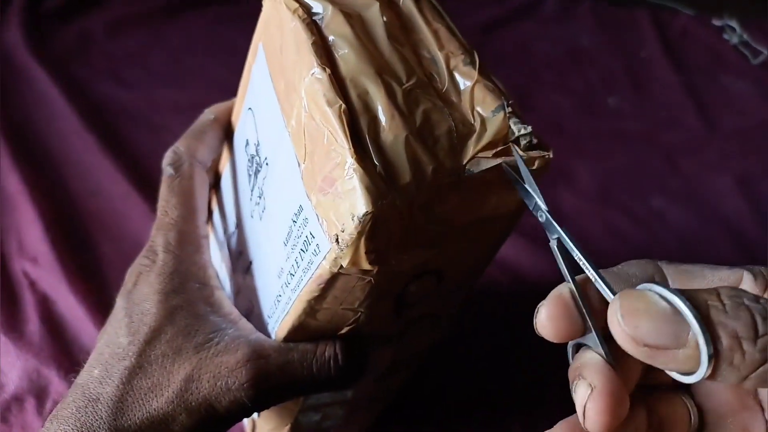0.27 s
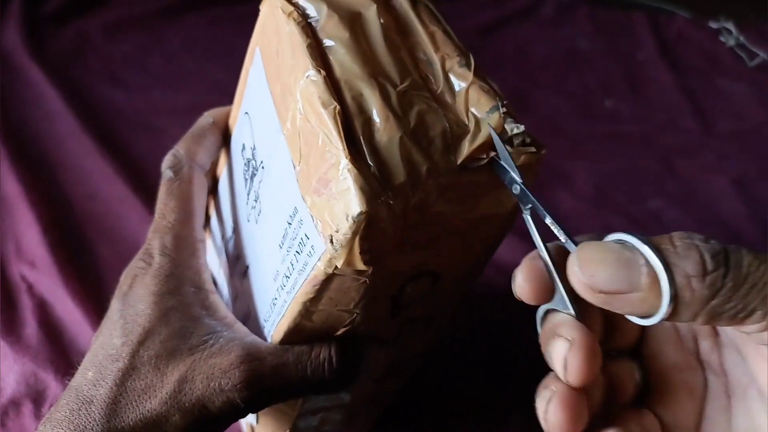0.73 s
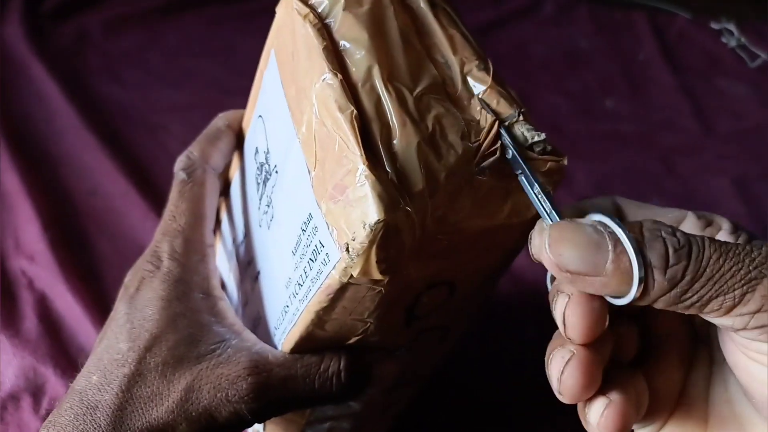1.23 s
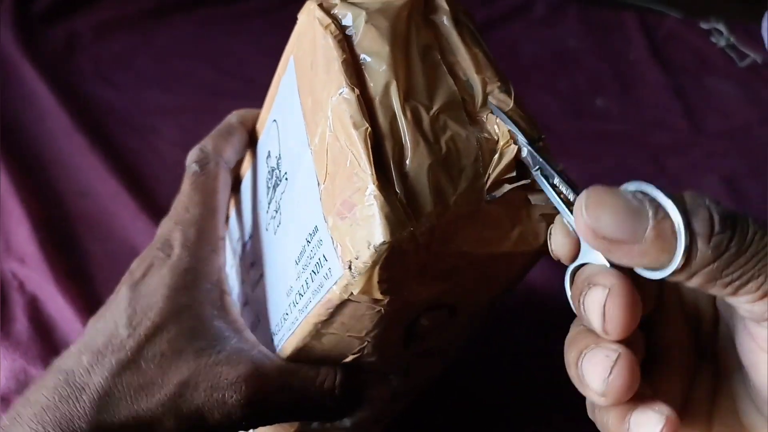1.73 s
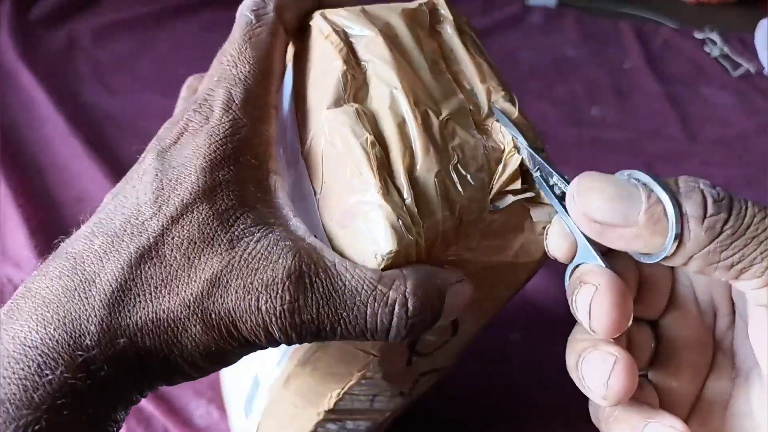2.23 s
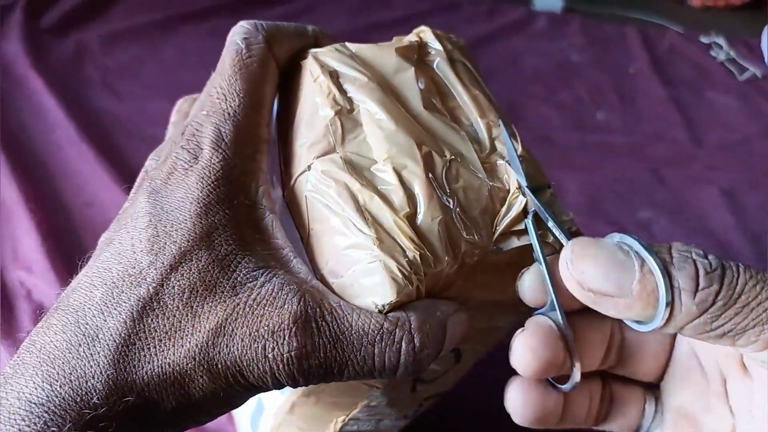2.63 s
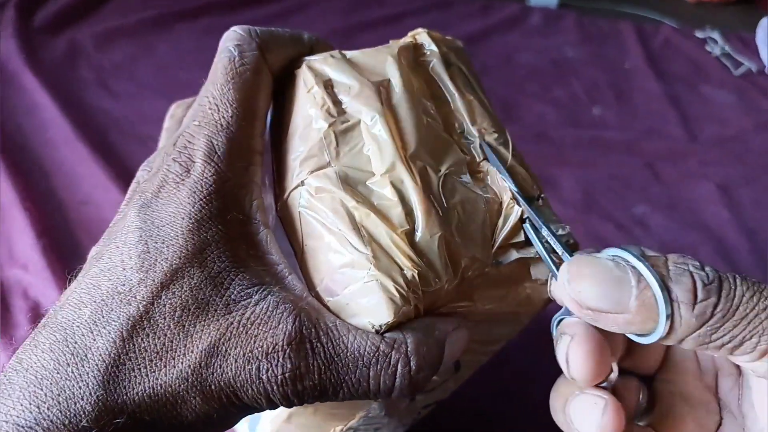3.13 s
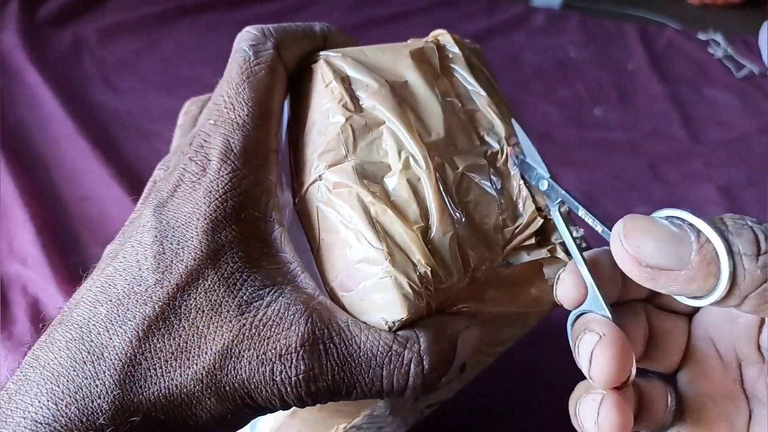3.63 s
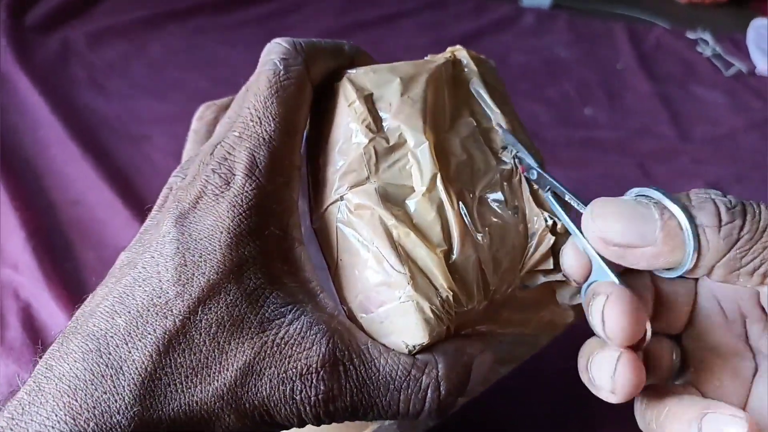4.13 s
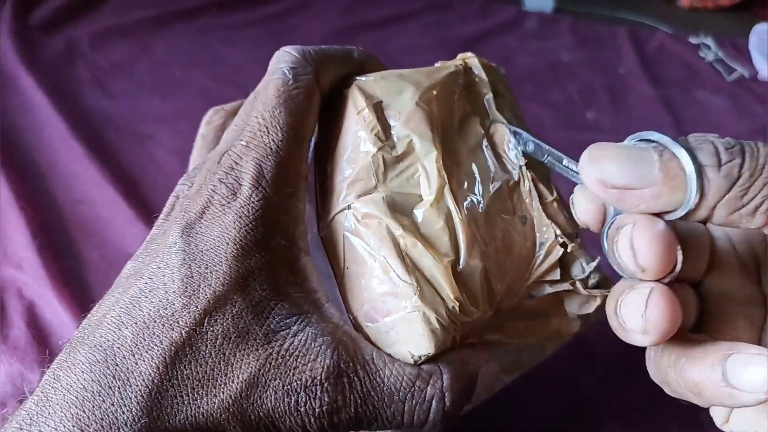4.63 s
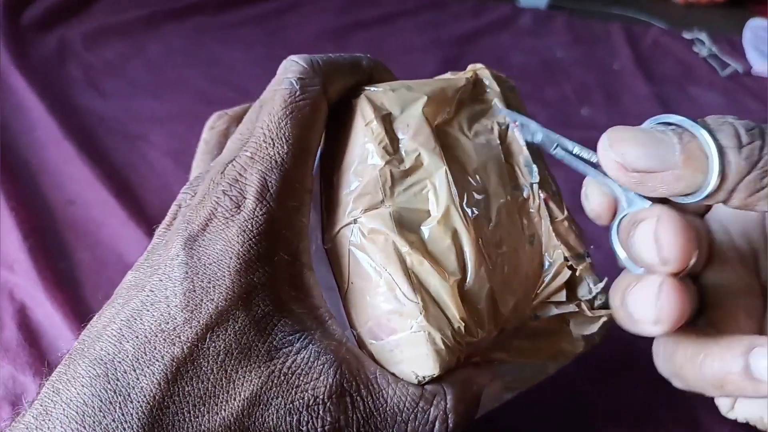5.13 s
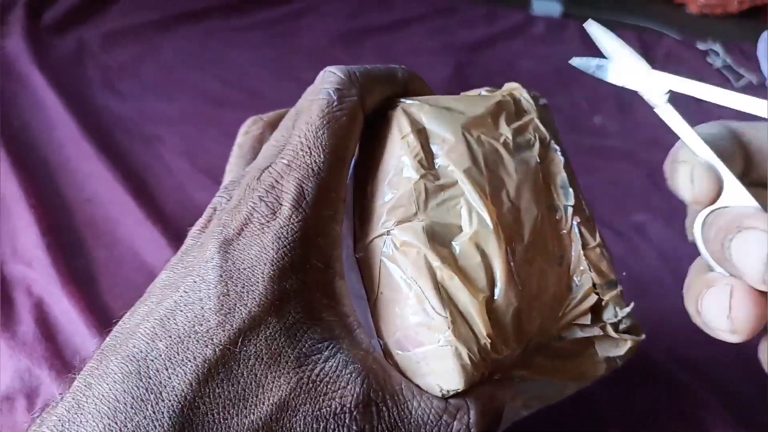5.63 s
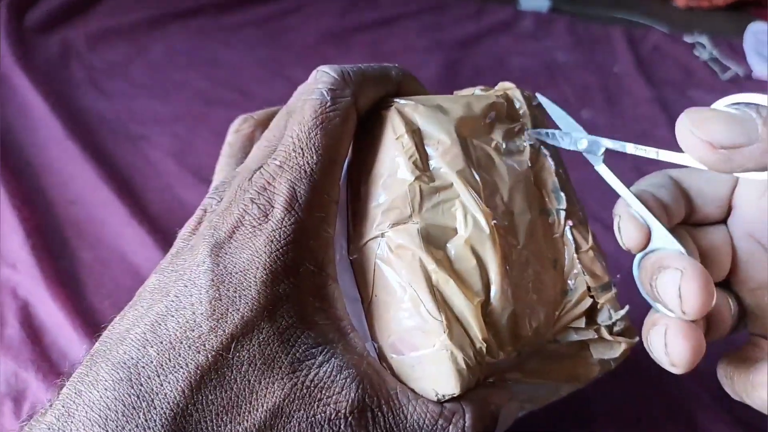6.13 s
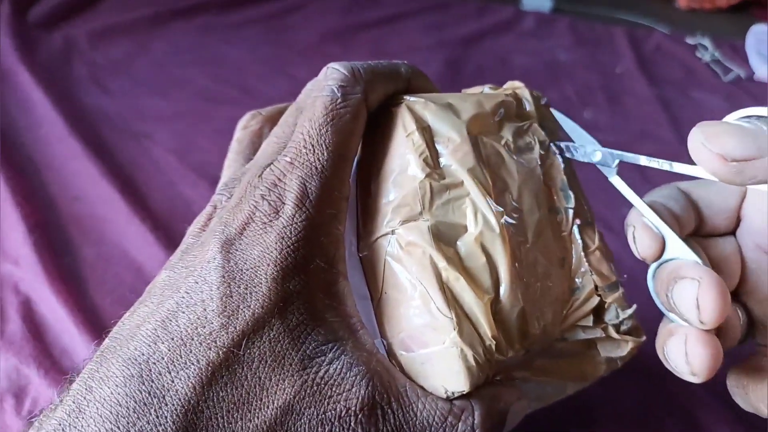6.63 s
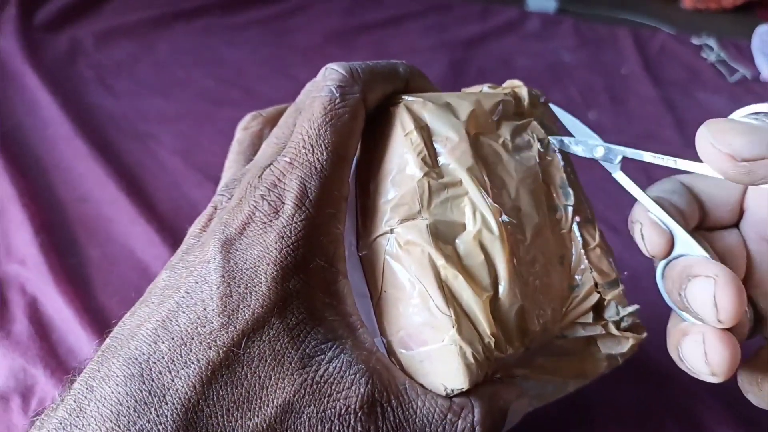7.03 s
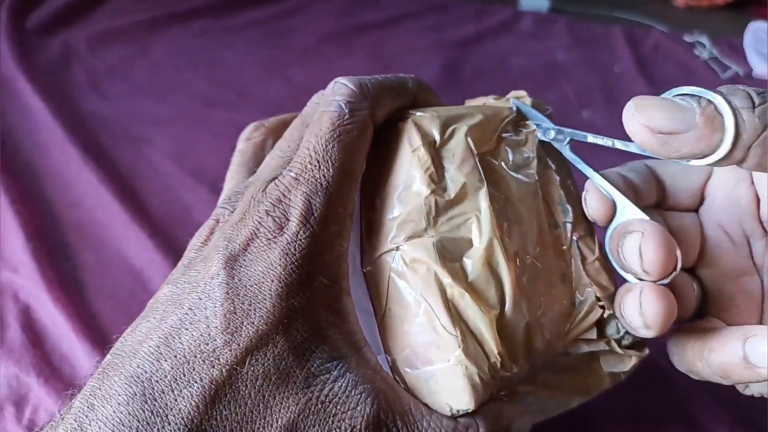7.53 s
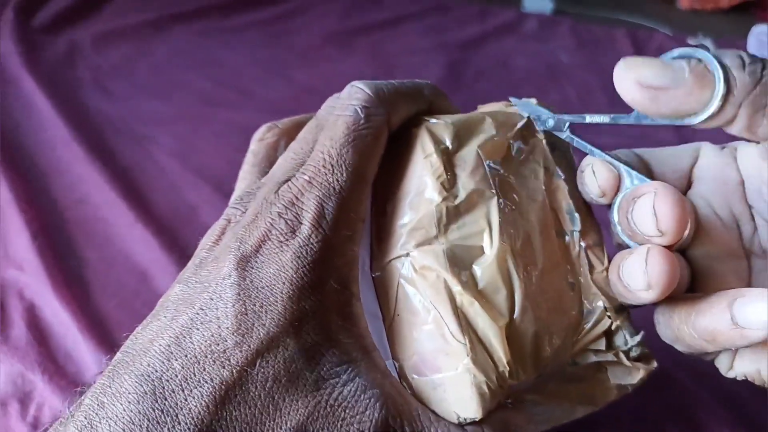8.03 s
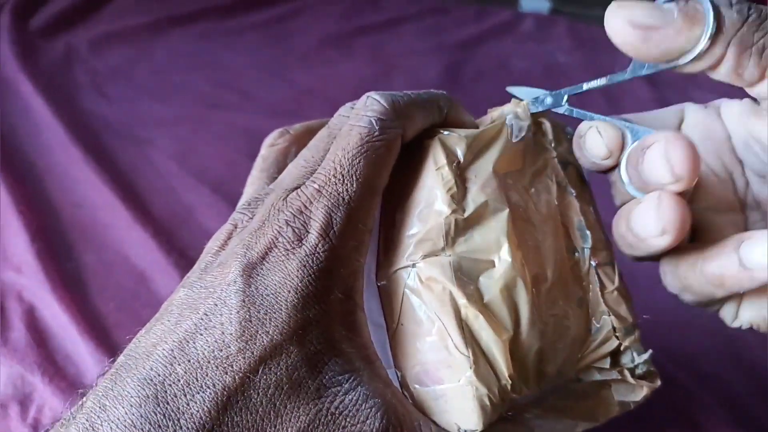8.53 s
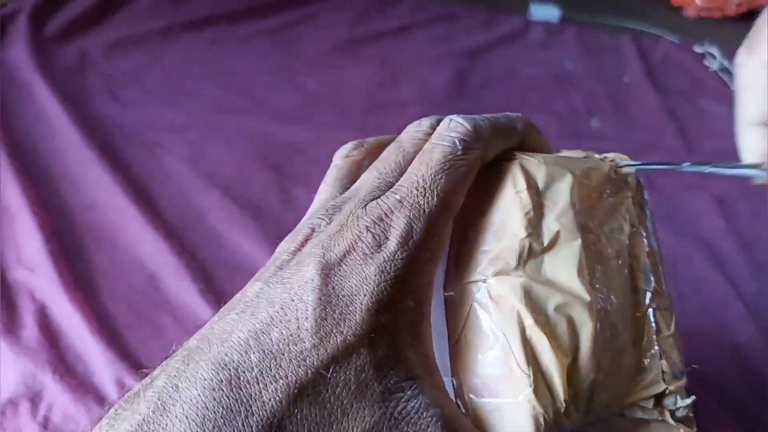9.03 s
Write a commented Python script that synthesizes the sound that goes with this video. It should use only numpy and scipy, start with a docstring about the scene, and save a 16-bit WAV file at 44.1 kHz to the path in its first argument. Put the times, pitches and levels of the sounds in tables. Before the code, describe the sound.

Close crackles, snaps and short rustles of parcel tape with dull cardboard knocks, over a soft distant rumble and steady room hush.

```python
"""A push booms and knocks in a hollow card parcel, close to a phone in a quiet room, over a soft low rumble.
Then small scissors pry and snip at its plastic tape: creases snap, crackle and rustle in short spells.
Snaps and knocks are noise bursts with brief rings; handling is random pops over sliding noise through
sheet and parcel resonances. A distant rumble swells and fades over the room's steady hush.
Two microphone ports hear it all with a short, dull echo on the close sounds."""
import sys
import numpy as np
from scipy import signal
from scipy.fft import rfft, irfft, next_fast_len
from scipy.io import wavfile
from scipy.ndimage import uniform_filter1d

SR = 44100
rng = np.random.default_rng(int(sys.argv[2]) if len(sys.argv) > 2 else 0)


def digitize_waveform(pressure):
    """Quantize a signal to 16-bit integers and store it at the path in sys.argv[1].

    Rows of a 2-D input are taken as channels; values are limited to [-1, 1].
    """
    field = np.atleast_2d(pressure).T
    bounded = np.clip(field, -1, 1)
    quanta = np.round(bounded * 32767).astype(np.int16)
    wavfile.write(sys.argv[1], SR, quanta)


N = 409688

# hush of the room, spectrum before overall levelling: pitch_hz [Hz], density_db [dB per Hz]
HUSH_SPECTRUM = [(30, 11), (80, 15.5), (280, -7), (600, 0), (1700, -2.5), (2500, -73), (4500, -47),
                 (8000, -87), (16000, -64)]
# swells of the distant rumble: time_s [s], level_db [dB]
RUMBLE_LEVEL = [(0.0, -54), (0.32, -65), (0.42, -43), (0.55, -54.5), (0.9, -53), (1.05, -59.5), (2.42, -57),
                (2.79, -64), (4.1, -60.5), (5.1, -60), (5.21, -54), (5.3, -59), (5.58, -38.5),
                (6.17, -45.5), (7.1, -46), (7.62, -54), (7.86, -38), (8.35, -41.5), (8.94, -48.5),
                (9.28, -41)]
# lowest resonances of the room, applied twice: pitch_hz [Hz], width_hz [Hz], one_pass_db [dB]
ROOM_MODES = [(74.9, 41.2, -2), (107.8, 42.3, 0.5), (151, 35.2, -0.5), (217.2, 47, -6)]
# pushes of the scissors against the wrap:
# start_s [s], hold_s [s], crackle_db [dB], sheet_rustle_db [dB], parcel_boom_db [dB]
SCISSOR_PUSHES = [(0, 0.017, -81, -68, -38), (0.068, 0.022, -88, -79, -44), (0.226, 0.016, -64, -70, -67),
                  (0.321, 0.011, -57, -66, -51), (0.4, 0.037, -64, -57.5, -41),
                  (0.491, 0.066, -50, -55, -49), (0.747, 0.029, -50, -53, -43),
                  (0.834, 0.043, -47, -45, -42), (0.915, 0.026, -34.5, -38.5, -36.5),
                  (0.973, 0.15, -56.5, -67, -56), (1.022, 0.034, -49, -57, -46),
                  (1.183, 0.059, -48, -53.5, -47.5), (1.274, 0.078, -46.5, -51, -53.5),
                  (1.481, 0.059, -46.5, -54.5, -51.5), (1.654, 0.23, -52, -56, -54),
                  (1.764, 0.15, -51, -50, -48.5), (1.976, 0.077, -52, -54, -53),
                  (2.132, 0.032, -52, -52, -55.5), (2.214, 0.09, -44, -46, -46.5),
                  (2.397, 0.046, -41, -42.5, -48.5), (2.492, 0.23, -48.5, -53.5, -56.5),
                  (2.747, 0.28, -55.5, -58, -78), (3.012, 0.12, -48, -51, -52),
                  (3.18, 0.1, -49.5, -57, -49.5), (3.336, 0.095, -40.5, -43.5, -45.5),
                  (3.674, 0.1, -54.5, -52.5, -51.5), (3.788, 0.12, -48, -52.5, -57),
                  (3.893, 0.075, -43, -44, -45.5), (3.99, 0.13, -54, -61, -60),
                  (4.18, 0.14, -51.5, -53.5, -51.5), (4.393, 0.084, -50, -49, -48.5),
                  (4.601, 0.036, -40.5, -40, -45.5), (4.699, 0.11, -42, -42.5, -43),
                  (4.975, 0.02, -40.5, -43, -43), (5.063, 0.026, -66, -74, -71),
                  (5.179, 0.026, -39.5, -39, -41), (5.259, 0.1, -49.5, -47, -49.5),
                  (5.436, 0.046, -51, -43.5, -48.5), (5.525, 0.088, -42, -42, -45),
                  (5.686, 0.68, -61.5, -57, -56), (5.696, 0.12, -61, -72, -69),
                  (6.238, 0.061, -58, -60, -65), (6.466, 0.017, -58, -65, -67),
                  (6.523, 0.055, -63.5, -68, -60), (6.72, 0.089, -58.5, -60.5, -54),
                  (6.955, 0.057, -59.5, -58.5, -49.5), (7.064, 0.13, -61, -68, -66),
                  (7.367, 0.061, -46.5, -44, -42.5), (7.585, 0.12, -49, -50.5, -49),
                  (7.725, 0.032, -63, -52.5, -49.5), (7.829, 0.088, -48, -48, -50),
                  (8.037, 0.13, -50, -47.5, -51), (8.205, 0.071, -57.5, -54.5, -61),
                  (8.319, 0.046, -38.5, -38, -39.5), (8.407, 0.1, -57.5, -53.5, -50),
                  (8.542, 0.13, -54, -52, -51.5), (8.788, 0.11, -51, -51.5, -57),
                  (8.961, 0.023, -49.5, -53, -63), (9.054, 0.052, -44, -41, -44.5),
                  (9.227, 0.09, -54, -56, -44.5)]
# parcel merely held, one value each: crackle_db, rustle_db, boom_db [dB]
HELD_LEVELS = [-68.5, -64, -56.5]
# resonances of the plastic sheet: pitch_hz [Hz], width_hz [Hz], level_db [dB]
SHEET_MODES = [(1132, 257, -1), (1910, 1050, 4.5), (2410, 1800, 4.5), (3320, 525, 1)]
# resonances of the hollow parcel, one pass for knocks, two for boom:
# pitch_hz [Hz], width_hz [Hz], one_pass_db [dB]
PARCEL_MODES = [(240.3, 134.5, 0), (396, 162, 0.5), (661, 321, -3.5), (1230, 480, -20.5)]
# knocks into the parcel, before layer gains and limits on fall:
# peak_s [s], level_db [dB], pitch_hz [Hz], fall_s [s]
PARCEL_KNOCKS = [(0.029, -32.5, 269, 0.011), (0.26, -36.5, 734, 0.0015), (0.553, -31, 437, 0.0017),
                 (0.749, -15, 370, 0.0027), (0.833, -19, 388, 0.003), (0.923, -18, 500, 0.001),
                 (0.933, -9, 530, 0.0017), (0.943, -28, 260, 0.0023), (0.98, -26, 308, 0.0029),
                 (0.996, -29, 340, 0.0029), (1.018, -15.5, 390, 0.0032), (1.064, -30.5, 300, 0.0062),
                 (1.228, -27.5, 620, 0.0011), (2.024, -26.5, 820, 0.0009), (2.28, -24, 674, 0.00088),
                 (2.297, -38, 330, 0.0015), (2.354, -34, 676, 0.0016), (3.107, -29, 284, 0.0029),
                 (3.286, -36, 320, 0.002), (3.36, -18.5, 305, 0.0053), (3.423, -23.5, 680, 0.002),
                 (3.943, -38, 305, 0.0034), (4.253, -21, 310, 0.0031), (4.401, -30.5, 332, 0.0051),
                 (4.451, -35.5, 358, 0.011), (4.603, -33, 342, 0.0029), (4.716, -33, 330, 0.0033),
                 (4.983, -30, 270, 0.003), (5.128, -31.5, 353, 0.0043), (5.188, -29.5, 313, 0.0025),
                 (5.204, -24, 229, 0.0035), (5.212, -28, 350, 0.0053), (5.363, -26, 273, 0.0025),
                 (5.626, -27.5, 300, 0.005), (6.239, -34, 320, 0.0032), (6.545, -22, 347, 0.003),
                 (6.988, -25.5, 320, 0.0029), (7.355, -35, 220, 0.003), (7.396, -33, 347, 0.01),
                 (7.902, -32, 313, 0.0042), (8.317, -27, 314, 0.0054), (8.329, -37, 270, 0.0027),
                 (8.341, -14, 290, 0.0026), (8.37, -30, 295, 0.0054), (8.597, -26, 354, 0.00079),
                 (8.71, -27.5, 790, 0.0014), (8.791, -20, 580, 0.00052), (8.811, -28, 705, 0.00082),
                 (9.118, -30, 310, 0.0041), (9.2, -29.5, 650, 0.0014), (9.251, -27.5, 363, 0.0035)]
# single snaps of the tape, before layer gains:
# peak_s [s], crack_db [dB], crack_hz [Hz], sizzle_db [dB], sheet_ring_db [dB], sheet_ring_hz [Hz]
TAPE_SNAPS = [(0.2577, -47, 7400, -46, -44, 2300), (0.5505, -28.5, 7500, -20.5, -26, 2470),
              (0.563, -50, 5800, -43, -48, 1700), (0.5817, -41, 6640, -31, -52, 1020),
              (0.6115, -36, 8800, -32, -39.5, 3130), (0.732, -30, 8700, -29, -43, 1850),
              (0.748, -17.5, 7200, -12.5, -13.5, 1100), (0.7533, -36, 7200, -21, -21.5, 980),
              (0.7675, -35, 6000, -31, -38, 1810), (0.832, -36, 5270, -27.5, -45, 750),
              (0.8713, -37, 5400, -45, -46, 2270), (0.9319, -27, 8900, -18, -14.5, 750),
              (0.9434, -25, 6540, -18, -25, 1050), (1.0049, -38, 6600, -37, -49, 830),
              (1.1155, -42, 6500, -49, -36.5, 1920), (1.1353, -34, 4700, -40, -41, 2800),
              (1.1898, -22, 6440, -39, -42, 3530), (1.3088, -32, 6700, -38, -40, 1970),
              (1.3332, -45, 9500, -25.5, -43, 750), (1.3663, -23.5, 5300, -55, -36, 2110),
              (1.4773, -32, 4230, -34, -35.5, 2860), (1.4946, -31, 6800, -27, -33, 2130),
              (1.529, -37, 5400, -35, -41, 750), (1.5935, -27.5, 5100, -45, -33.5, 2400),
              (1.8171, -34, 4430, -41, -23, 2850), (1.8937, -26.5, 6350, -20.5, -43, 2930),
              (1.9972, -47, 8600, -30, -58, 3480), (2.0226, -30, 6500, -29, -23.5, 1040),
              (2.1966, -44, 9000, -23.5, -47, 2450), (2.2172, -23, 6540, -21, -27, 2400),
              (2.2433, -30, 6400, -34, -31.5, 1390), (2.2615, -42, 6600, -33, -31, 1490),
              (2.2785, -37, 6400, -23, -30.5, 730), (2.2834, -23, 9400, -15.5, -32, 790),
              (2.3207, -32, 6100, -29, -35, 1170), (2.3535, -20, 6200, -21, -21, 3170),
              (2.3966, -40, 5600, -29, -25.5, 1240), (2.4236, -46, 8900, -36, -33, 2430),
              (2.5122, -30, 4830, -34, -36, 3100), (2.5323, -39, 4200, -40, -28, 2820),
              (2.5774, -30.5, 6300, -28, -26.5, 2700), (2.6476, -36, 3620, -29, -31, 3100),
              (2.6867, -40, 7900, -29, -37, 2310), (2.6971, -32, 6200, -31, -53, 1720),
              (2.9372, -37, 6300, -28, -39.5, 2080), (3.0248, -24, 4700, -37, -37, 2280),
              (3.047, -35, 3900, -25, -23.5, 2670), (3.1049, -34, 6600, -26, -29, 1860),
              (3.2418, -29, 9500, -30, -30, 3180), (3.2593, -29, 6160, -28, -41, 1980),
              (3.2903, -31, 3560, -49, -28.5, 3100), (3.3325, -26.5, 5800, -26, -20, 3020),
              (3.3541, -25, 6100, -27, -33, 740), (3.3668, -24, 6100, -23, -24.5, 2140),
              (3.4012, -42, 7800, -31, -41, 2150), (3.4231, -42, 5200, -34, -18, 1120),
              (3.4392, -30, 7500, -19, -33, 3220), (3.611, -39, 5760, -54, -45, 2240),
              (3.7188, -48, 6000, -29, -42, 1730), (3.7405, -30, 7000, -30, -26, 2390),
              (3.9357, -30, 6200, -26, -30, 1940), (3.942, -33, 8000, -26, -33, 750),
              (3.973, -32, 9500, -37, -34, 2020), (4.013, -32, 8500, -30, -37, 2010),
              (4.0622, -36, 5230, -46, -31, 2400), (4.104, -35, 7400, -23.5, -22.5, 2210),
              (4.2533, -24, 7500, -24, -24.5, 2770), (4.3178, -36, 5830, -46, -34, 1290),
              (4.3222, -41, 6400, -33, -46, 2620), (4.3441, -35, 6100, -42, -23.5, 2220),
              (4.3542, -30, 7600, -28, -40, 2730), (4.4565, -37, 6600, -22.5, -44, 1800),
              (4.5004, -30, 7360, -30.5, -38, 3320), (4.6077, -26.5, 7500, -32, -47, 1870),
              (4.7252, -34, 6000, -36, -32, 2240), (4.8, -44, 6700, -36, -42, 2250),
              (4.9436, -58, 9300, -29, -35, 2140), (4.9744, -25, 9500, -27, -24, 1520),
              (4.9827, -30, 7200, -27, -19.5, 2800), (5.0005, -32, 4100, -26, -20, 2350),
              (5.0766, -38, 3600, -25, -24, 2830), (5.0938, -46, 9500, -31, -44, 2880),
              (5.0985, -34.5, 6500, -30, -28.5, 2840), (5.1993, -30, 6800, -26, -35, 3050),
              (5.2807, -34, 6300, -34, -30, 2530), (5.3459, -49, 5600, -53, -30.5, 2190),
              (5.3549, -35, 6400, -43, -23, 2280), (5.3631, -29, 6700, -22.5, -18, 2670),
              (5.4673, -44, 9500, -20.5, -47, 1880), (5.5051, -27, 8300, -25.5, -34, 3060),
              (5.5284, -37, 7800, -28, -42, 2800), (5.5889, -32, 6200, -28, -21, 2760),
              (5.5961, -27, 5800, -38, -31, 3010), (5.6046, -38, 3600, -31, -46, 3180),
              (5.7452, -42, 6500, -38, -56, 1640), (5.7831, -33, 8250, -27, -33, 2660),
              (6.1261, -40, 5900, -38, -25.5, 2450), (6.2637, -41, 6700, -32.5, -41, 2280),
              (6.4463, -51, 9500, -24, -32.5, 2900), (6.5382, -35.5, 5450, -26.5, -23, 2650),
              (6.583, -64, 3700, -57, -38, 2350), (6.7256, -37, 3580, -28, -32, 3030),
              (6.7568, -56, 9500, -36, -48, 2260), (6.7839, -34, 6700, -37, -35, 3070),
              (6.8184, -53, 9500, -25, -39.5, 3200), (6.986, -43, 3600, -39, -55, 790),
              (6.9985, -55, 3600, -50, -35, 2780), (7.007, -40, 4200, -48, -35, 2580),
              (7.0644, -52, 6700, -40, -38, 2500), (7.4575, -39.5, 6560, -38, -35.5, 2390),
              (7.4839, -43, 3600, -37, -35, 2730), (7.5792, -40, 4500, -29.5, -32, 1650),
              (7.6223, -31, 6130, -23, -28, 1260), (7.6672, -44, 9500, -24, -41, 2270),
              (7.8719, -28.5, 3560, -21, -21.5, 3000), (7.938, -32.5, 8500, -31, -47, 3270),
              (8.0718, -27, 4430, -28, -28, 3110), (8.1605, -43, 8000, -39, -37, 3060),
              (8.3025, -43, 3600, -29, -28, 2940), (8.3286, -42, 5500, -29, -21, 2790),
              (8.3354, -34, 5600, -21, -13.5, 2680), (8.3456, -26.5, 6640, -34, -39, 2720),
              (8.3701, -29.5, 4300, -23, -21.5, 2840), (8.4222, -40, 6200, -36, -34, 2360),
              (8.5468, -57, 5300, -46, -33.5, 1150), (8.5576, -46, 3600, -34, -32, 2000),
              (8.6144, -35, 3600, -24.5, -20.5, 3000), (8.7098, -36, 6200, -31, -24.5, 2050),
              (8.7902, -35, 4000, -23.5, -29, 790), (8.8989, -35.5, 6540, -40, -32, 2840),
              (9.0857, -37, 3560, -43, -42, 2780), (9.201, -26.5, 5700, -29, -23.5, 1480),
              (9.2419, -43, 4600, -30, -27.5, 2630), (9.2535, -40, 3900, -38, -30.5, 895),
              (9.2644, -36, 8900, -30, -27.5, 2830)]
# the two microphone ports: pitch_hz [Hz], left_db [dB], right_db [dB], likeness [0-1, before the spread power]
MIC_PORTS = [(40, 0, 0, .9), (300, 0, 0, .985), (600, 0, 0, .94), (850, -2, -2, .82),
             (1300, 1.5, -1.5, .85), (3000, 0, 0, .7), (4800, 0, 0, .25), (6700, -1, 2, .2),
             (7400, -3, 0, .5), (9300, -2, -2, .5), (10000, 2, -4, .2), (11400, 3, -6, .2),
             (11700, 9, -4, .2), (15500, 3, -4, .2), (15900, -8, -14, .2)]

HUSH_DB = -60.5
ATTACK_DB_PER_S, RELEASE_DB_PER_S = 500, 305
KNOCK_RISE_SHARE = 0.66  # rise time over fall time
ROOM_T60_S, ROOM_DB, ROOM_SOFT_HZ = 0.25, -12, 6000  # ROOM_DB is the tail's level before it is dulled
RIGHT_LAG_S = 0.000084
MIC_LOW_HZ, TOP_HZ = 62, 16700
TIME_S = np.arange(N) / SR
SIZE = next_fast_len(N + SR)
FREQ = np.arange(SIZE // 2 + 1) * SR / SIZE + 1e-3  # Hz, kept off zero for the divisions


def undb(db):
    """Amplitude from dB."""
    return 10 ** (np.asarray(db) / 20)


def unit(x):
    """Level to an RMS of 1."""
    return x / np.sqrt(np.mean(x ** 2))


def noise():
    """Independent white noise for each of the two paths."""
    return rng.standard_normal((2, N))


def shape(x, gain):
    """Filter by a frequency response."""
    return irfft(rfft(x, SIZE) * gain, SIZE)[..., :N]


def band(x, lo_hz, hi_hz):
    """Keep one band of pitches."""
    sos = signal.butter(3, [lo_hz, hi_hz], "bandpass", fs=SR, output="sos")
    return signal.sosfilt(sos, x)


def resonances(modes):
    """Response of band-pass resonances side by side, with alternating signs."""
    response = 0
    for k, (hz, width_hz, db) in enumerate(modes):
        detune = (FREQ / hz - hz / FREQ) * hz / width_hz
        response = response + (-1) ** k * undb(db) / (1 + 1j * detune)
    return response


def walk(rate):
    """Random levels held 1 / rate s and smoothed twice, at an RMS near 1."""
    k = int(SR / rate)
    steps = np.repeat(rng.standard_normal(N // k + 1), k)
    return unit(uniform_filter1d(uniform_filter1d(steps, k), k)[:N])


def bursts(s, db, rise_s, decay_s):
    """Envelope of bursts that swell up to their moment and die away after it."""
    kicks = np.zeros(N)  # power
    np.add.at(kicks, np.clip((s * SR).astype(int), 0, N - 1), undb(2 * db))
    after = signal.lfilter([1], [1, -np.exp(-2 / (decay_s * SR))], kicks)
    before = signal.lfilter([1], [1, -np.exp(-2 / (rise_s * SR))], kicks[::-1])[::-1]
    return np.sqrt(np.maximum(after + before - kicks, 0))


def rings(s, db, hz, rise_s, fall_s):
    """Short rings at half strength rise_s before and fall_s after the peak; a random phase for each path."""
    out = np.zeros((2, N + 2 * SR))  # one spare second at each end
    phases = 2 * np.pi * rng.random((len(s), 2))
    peaks = (s * SR).astype(int) + SR
    for peak, gain, f, rise, fall, phase in zip(peaks, undb(db), hz, rise_s, fall_s, phases):
        k = np.arange(-int(3 * rise * SR), int(8 * fall * SR) + 1)
        u = k / SR
        env = np.where(u < 0, .5 ** ((u / rise) ** 2), .5 ** (np.abs(u / fall) ** 1.4))
        out[:, peak + k] += gain * env * np.sin(2 * np.pi * f * u + phase[:, None])
    return out[:, SR:SR + N]


def hush():
    """The steady air of the room: noise with a fixed spectrum."""
    hz, db = np.transpose(HUSH_SPECTRUM)
    spectrum = undb(np.interp(np.log(FREQ), np.log(hz), db))
    return unit(shape(noise(), spectrum)) * undb(HUSH_DB)


def rumble():
    """A low distant rumble that swells, fades and throbs in the room's lowest resonances."""
    throbbing = noise() * undb(2.2 * walk(24.0))
    s, level_db = np.transpose(RUMBLE_LEVEL)
    return unit(shape(throbbing, resonances(ROOM_MODES) ** 2)) * undb(np.interp(TIME_S, s, level_db))


def effort():
    """Crackle, rustle and boom levels in dB: every push swells, holds and lets go in the same way."""
    t = np.arange(0, N, 32) / SR
    start, hold, *push_db = np.transpose(SCISSOR_PUSHES)[:, :, None]
    swell_db = ATTACK_DB_PER_S * np.maximum(start - t, 0)
    letting_go_db = RELEASE_DB_PER_S * np.maximum(t - start - hold, 0)
    levels = []
    for db, held_db in zip(push_db, HELD_LEVELS):
        power = undb(2 * held_db) + undb(2 * (db - swell_db - letting_go_db)).sum(axis=0)
        levels.append(np.interp(TIME_S, t, 10 * np.log10(power)))
    return levels


def handling(per_second=220, scatter_db=4.0, tint_db=6.5, calm_db=-59):
    """Tiny creases pop at random over a sliding wrap, a few much bigger, each with its own colour."""
    crackle_db, rustle_db, boom_db = effort()
    count = rng.poisson(per_second * N / SR)
    s = rng.random(count) * N / SR
    size_db = -scatter_db * np.log(rng.random(count) + 1e-9)
    colour = tint_db * rng.standard_normal((4, count))
    # a gently held wrap only slides, a busy one mostly pops
    busy = 1 / (1 + undb(3.0 * (calm_db - crackle_db)))
    # the slide sticks and slips
    catching = undb(4.5 * np.clip(walk(80.0), -1.5, 1.8))
    sheet, parcel = resonances(SHEET_MODES), resonances(PARCEL_MODES) ** 2
    layers = 0
    # pop rise s, pop decay s, slide share, level dB, body of the sound
    for tint, (rise_s, decay_s, slide, level_db, body) in zip(colour, [
            (.0002, .0006, .45, crackle_db - 6.5, lambda x: band(x, 3700, 7840)),
            (.0002, .0005, .45, crackle_db - 4, lambda x: band(x, 7900, 15200)),
            (.0005, .0012, .55, rustle_db, lambda x: shape(x, sheet)),
            (.002, .003, .6, boom_db, lambda x: shape(x, parcel))]):
        pop_db = np.minimum(size_db + tint, 14)
        pops = unit(bursts(s, pop_db, rise_s, decay_s))
        grain = busy * (pops + slide * catching) + 1 - busy
        layers = layers + unit(body(noise() * grain)) * undb(level_db)
    return layers


def knocks():
    """Each knock rings the parcel wall near one pitch and shakes all of its resonances."""
    s, db, hz, fall_s = np.transpose(PARCEL_KNOCKS)
    rise_s = np.clip(KNOCK_RISE_SHARE * fall_s, 5e-4, .01)
    wall = rings(s, db, hz, rise_s, np.clip(fall_s, 5e-4, .01))
    shake = shape(noise() * bursts(s, db, 0.0035, 0.002), resonances(PARCEL_MODES))
    return 0.85 * wall + 2.8 * shake


def snaps():
    """A crease flips: a sharp coloured crack, a brighter sizzle, a few cycles of the sheet, a faint settling."""
    s, crack_db, crack_hz, sizzle_db, ring_db, ring_hz = np.transpose(TAPE_SNAPS)
    # each envelope is a sharp burst plus a fainter settling
    crack = bursts(s, crack_db, 0.00045, 0.00014) + 0.77 * bursts(s, crack_db, 0.0015, 0.0031)
    sizzle = bursts(s, sizzle_db, 0.000084, 0.0003) + 0.13 * bursts(s, sizzle_db, 0.0016, 0.0031)
    rattle = bursts(s, ring_db, 0.0018, 0.0005) + 0.061 * bursts(s, ring_db, 0.00083, 0.0023)
    out = 1.06 * band(noise() * crack, 4710, 8700)
    out += 1.43 * rings(s, crack_db, crack_hz, 1.0 / crack_hz, 3.7 / crack_hz)
    out += 2.3 * band(noise() * sizzle, 9300, .45 * SR)
    out += 1.47 * shape(noise() * rattle, resonances(SHEET_MODES))
    out += 1.61 * rings(s, ring_db, ring_hz, 0.25 / ring_hz, 1.1 / ring_hz)
    return out


def room(x):
    """Soft furnishings return a short, dull, diffuse tail."""
    u = np.arange(SR // 2) / SR
    decay = np.exp(-np.log(1000) * u / ROOM_T60_S)
    tail = rng.standard_normal((2, len(u))) * decay * (u > .002)
    tail = tail / np.sqrt(np.sum(tail ** 2, axis=1, keepdims=True))
    return undb(ROOM_DB) * shape(x, rfft(tail, SIZE) / (1 + 1j * FREQ / ROOM_SOFT_HZ))


def ports(paths, spread):
    """The right port hears the left's path a little later, blended with its own; spread makes them less alike."""
    hz, *cols = np.transpose(MIC_PORTS)
    left_db, right_db, alike = (np.interp(np.log(FREQ), np.log(hz), c) for c in cols)
    alike = np.clip(alike, 0, 1) ** spread
    one, other = rfft(paths, SIZE)
    later = np.exp(-2j * np.pi * FREQ * RIGHT_LAG_S) * one
    right = alike * later + np.sqrt(1 - alike ** 2) * other
    return irfft(np.array([undb(left_db) * one, undb(right_db) * right]), SIZE)[:, :N]


def scene():
    """Snaps and knocks come from one close spot; rumble, rustle, echo and hush arrive from a wider spread."""
    rustle = handling()
    hits = knocks() + snaps()
    wide = rustle + room(hits + rustle) + hush()
    return ports(hits, 0.86) + ports(rumble(), 3.1) + ports(wide, 7.7)


def record(dry):
    """The phone loses the deep bass and cuts the top."""
    lean = shape(dry, 1 / (1 - 1j * MIC_LOW_HZ / FREQ) ** 2)
    return signal.sosfilt(signal.ellip(10, .2, 80, TOP_HZ, fs=SR, output="sos"), lean)


dry = scene()
out = record(dry)
digitize_waveform(out)
```